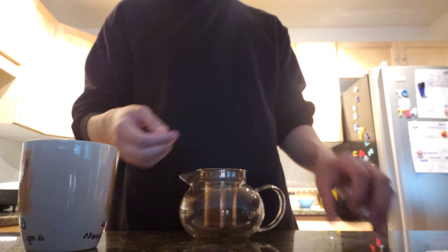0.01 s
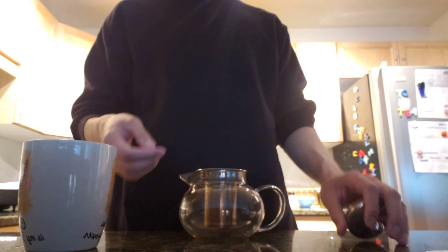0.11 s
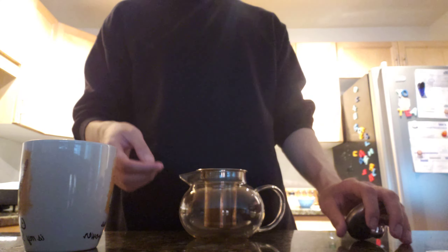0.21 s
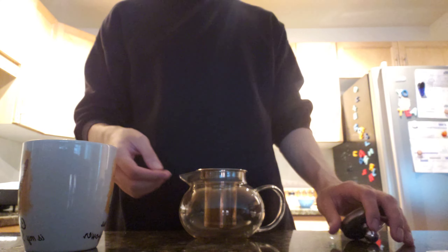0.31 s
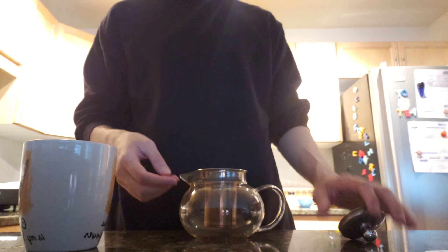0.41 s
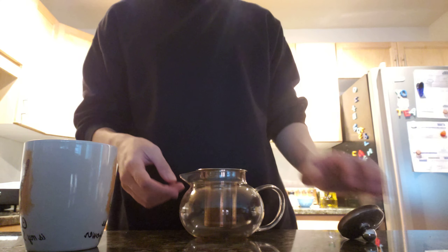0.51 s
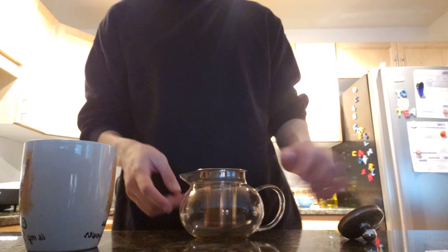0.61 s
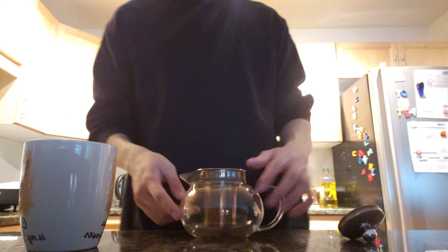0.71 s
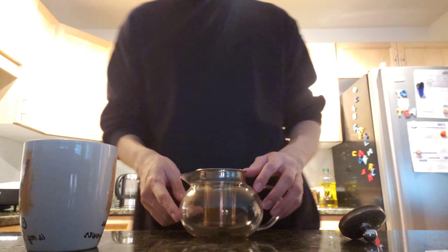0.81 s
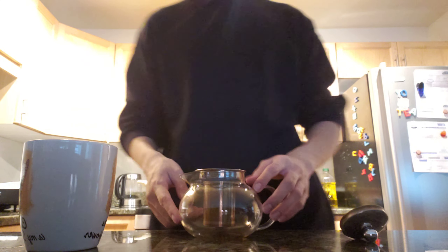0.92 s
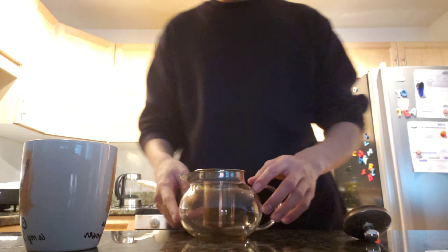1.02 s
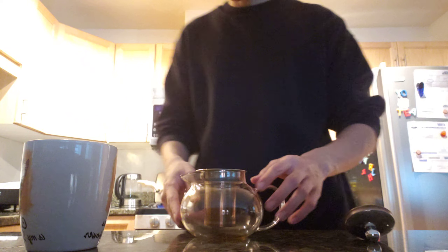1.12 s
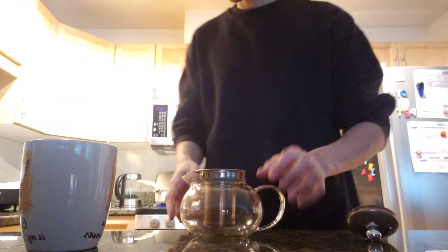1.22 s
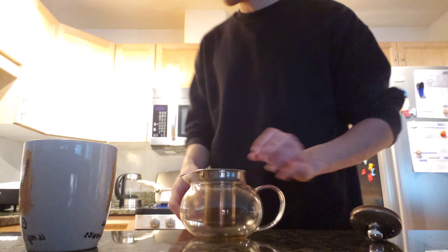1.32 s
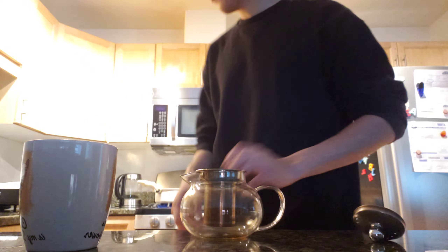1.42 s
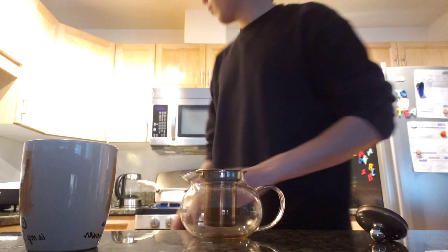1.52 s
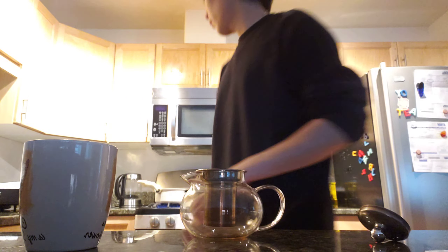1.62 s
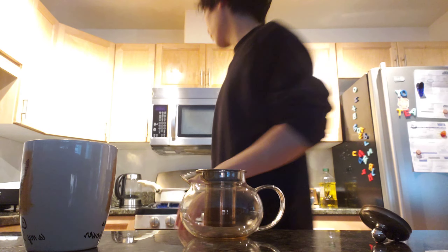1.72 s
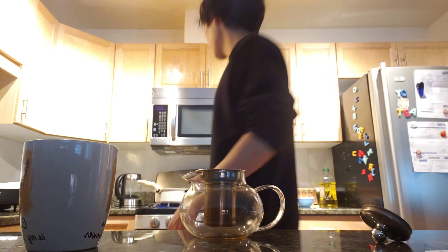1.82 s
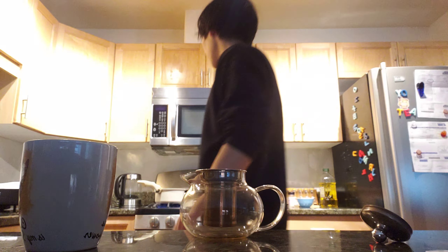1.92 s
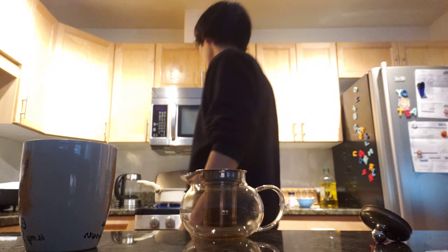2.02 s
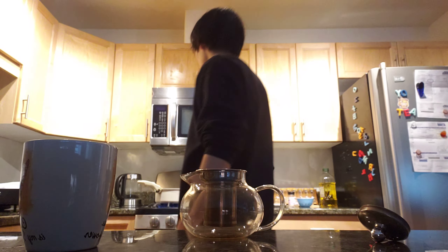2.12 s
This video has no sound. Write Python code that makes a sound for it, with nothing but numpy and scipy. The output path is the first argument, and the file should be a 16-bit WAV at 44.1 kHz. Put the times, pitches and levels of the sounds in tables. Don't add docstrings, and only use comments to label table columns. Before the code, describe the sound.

Close up, a thin metal lid ticks and knocks onto stone, its high ring quickly damped; then soft foot shifts farther off, with short kitchen reflections and quiet air rumble captured by small stereo microphones.

```python
import sys
import numpy as np
from scipy import signal
from scipy.fft import rfft, irfft
from scipy.io import wavfile
from scipy.ndimage import uniform_filter1d

SR = 44100
rng = np.random.default_rng(int(sys.argv[2]) if len(sys.argv) > 2 else 0)


def master(y):
    cut = np.clip(np.atleast_2d(y).T, -1, 1)
    pcm = np.round(cut * 32767)
    wavfile.write(sys.argv[1], SR, pcm.astype(np.int16))


def convert_level_to_amplitude(level_db):
    exponent = np.asarray(level_db, float) / 20
    return 10 ** exponent


N = 97020
T = np.arange(N) / SR
PUSH_S = 0.00062
RIM_TWIST = 1

# (time [s], stone knock [dB], bowl ring [dB], rim ring [dB])
CONTACTS = [(0.3607, -12.5, -12.5, -41.5), (0.3685, -12, -27.5, -45.5), (0.3694, -29, -28.5, -24.5),
            (.3715, -27.5, -29.5, -22.5), (.3730, -20, -32.5, -25), (0.3753, -23.5, -33, -24.5),
            (0.3787, -19, -31, -23), (.3815, -22, -24, -27), (.3838, -25.5, -33.5, -29),
            (.3860, -26, -31, -32.5), (.3930, -25.5, -32, -39.5)]
TICK_S = [.2231, .2296, .2432]
# (body [dB], crack [dB], rim [dB])
TICKS = [
    (-22.5, -24, -18.5),
    (-39.5, -33, -36.5),
    (-35.5, -48, -44),
]
RIM_HZ = [9300, 10540, 10695, 10845, 10960, 11170, 11400, 11542, 11600, 12240, 12908, 13300, 13735, 14490]


def read(table, hz, column=1):
    table = np.array(table)
    return np.interp(np.log(hz), np.log(table[:, 0]), table[:, column])


def band(x, hz, width):
    centre = min(hz, .45 * SR)
    sharpness = max(hz / width, .2)
    return signal.lfilter(*signal.iirpeak(centre, sharpness, fs=SR), x)


def unit(x):
    return x / np.sqrt(np.mean(x ** 2))


def ring(contacts, modes, column, push, spread=0):
    left_lag_s = .000148
    out = np.zeros((2, N))
    scatter = 3.1 * rng.standard_normal((len(contacts), len(modes)))
    twist = spread * rng.standard_normal(len(modes))
    for row, chance in zip(contacts, scatter):
        first = int(row[0] * SR) - 8
        last = first + SR // 2
        for side, lag in ((0, left_lag_s), (1, 0)):
            t = np.maximum(T[first:last] - row[0] - lag, 0)
            for (hz, db, t60, pan), c, turn in zip(modes, chance, twist):
                fade = np.exp(-np.log(1000) * t / t60) * (1 - np.exp(-t / push))
                level = convert_level_to_amplitude(row[column] + db + c - pan * side)
                out[side, first:last] += level * fade * np.sin(2 * np.pi * hz * t + turn * (1 - side))
    return out


def muting(start, drop_db):
    return convert_level_to_amplitude(drop_db * np.clip((T - start) / 0.0012, 0, 1))


def stone_knock():
    stone_hz = [382, 540, 660, 872, 995, 1265, 1400, 1690, 1876, 2010, 2275, 2546, 2722, 3240]
    # (level [dB], fade by 60 dB [s], left-right [dB])
    stone = [(-28.5, 0.017, 2.5), (-25.5, 0.024, 1), (-26, 0.028, -0.5), (-19, 0.07, 1), (-16, 0.04, 0.5),
             (-15.5, 0.015, 2), (-14.5, 0.022, 0.5), (-15.5, 0.038, 1), (-15, 0.03, 3.5), (5, 0.0022, 4),
             (-16, 0.035, 4), (-16.5, 0.025, 5.5), (-17.5, 0.014, 6), (-25, 0.025, 3)]
    knock = ring(CONTACTS, np.c_[stone_hz, stone], 1, PUSH_S / 4)
    return signal.sosfilt(signal.butter(N=2, Wn=260, btype="high", fs=SR, output="sos"), knock)


def bowl_ring():
    bowl_hz = [4164, 4287, 4750, 5184, 5600, 6480]
    # (level [dB], fade by 60 dB [s], left-right [dB])
    bowl = [(-10.5, .15, -5.5), (-2.5, 0.27, -4.5), (-8.5, 0.01, 1), (-10.5, 0.0067, -2),
            (-16.5, 0.0025, -5), (-21.5, 0.022, 0)]
    return ring(CONTACTS, np.c_[bowl_hz, bowl], 2, PUSH_S) * muting(.3733, -12.5)


def rim_ring():
    # (level [dB], fade by 60 dB [s], left-right [dB])
    rim = [(-28, 0.033, -6), (-9, .05, 1.5), (6.5, .09, -2.5), (-2, .1, -2), (-9.5, 0.052, -2),
           (-8.5, 0.087, -2.5), (-12, 0.06, 0), (-4.5, 0.08, -0.5), (-10, 0.04, 0.5), (-15.5, 0.048, 6.5),
           (-12.5, 0.034, 6.5), (-17.5, 0.035, 6.5), (-11, .07, 7), (-17, .07, 6.5)]
    return ring(CONTACTS, np.c_[RIM_HZ, rim], 3, PUSH_S / 2, RIM_TWIST)


def lingering_ring():
    linger_hz = [871, 4165, 4289, 4330]
    # (level [dB], fade by 60 dB [s], left-right [dB])
    linger = [(-26, .13, 3), (-31.5, 0.56, -0.5), (-27, .32, -1), (-29, 0.23, -3)]
    rim_linger_hz = [10695, 10848, 11545, 13735, 14490]
    # (level [dB], fade by 60 dB [s], left-right [dB])
    rim_linger = [(-17, .2, -2), (-24, .17, -2), (-12, .22, 2), (-24, .2, 7), (-23, 0.27, 7)]
    bowl = ring(CONTACTS, np.c_[linger_hz, linger], 1, PUSH_S)
    return bowl + ring(CONTACTS, np.c_[rim_linger_hz, rim_linger], 3, PUSH_S, RIM_TWIST)


def first_ticks():
    tick_body_hz = [888, 1335, 1800, 2794, 4204, 4290, 4850, 5179, 5706, 6800]
    # (level [dB], fade by 60 dB [s], left-right [dB])
    tick_body = [(-25, .06, 3), (-20, .012, 2), (-17.5, .01, 2), (-13, .03, 3.5), (-9, 0.041, -4.5),
                 (-24, .1, -4.5), (1, 0.0098, -4), (-1.5, .012, -2.5), (-13.5, 0.0081, -2),
                 (-9, 0.046, 0.5)]
    # (level [dB], fade by 60 dB [s], left-right [dB])
    tick_rim = [(-28, .03, -6), (-4.5, .03, 2), (1.5, .06, -2), (-4, 0.084, -2), (-5.5, 0.04, -2),
                (-9, .05, -1.5), (-8.5, 0.06, 0.5), (-5, 0.12, -1), (-9, .08, 2.5), (-16.5, 0.048, 6),
                (-14, 0.058, 7), (-17, 0.035, 6), (-11.5, .03, 7), (-13, .12, 6)]
    ticks = np.c_[TICK_S, TICKS]
    body = ring(ticks, np.c_[tick_body_hz, tick_body], 1, PUSH_S / 4)
    return body + ring(ticks, np.c_[RIM_HZ, tick_rim], 3, PUSH_S / 4, RIM_TWIST)


def rim_crack():
    crack_db, crack_s = -1.5, 0.0018
    strikes = [(s, row[1]) for s, row in zip(TICK_S, TICKS)]
    strikes += [(row[0], row[3] + crack_db) for row in CONTACTS]
    puff = sum(convert_level_to_amplitude(db) * np.exp(-np.maximum(T - s, 0) / crack_s) * (T > s) for s, db in strikes)
    burst = puff * rng.standard_normal((2, N))
    low = convert_level_to_amplitude(7) * band(band(burst, 5300, 1500), 5300, 2500)
    middle = convert_level_to_amplitude(-4.5) * band(band(burst, 7500, 2300), 7500, 2300)
    high = band(band(burst, 12000, 3800), 12500, 6000)
    return low + middle + high


def lid():
    muted = muting(.387, -15)
    knock, bowl, rim = stone_knock(), bowl_ring(), rim_ring()
    crack, tick = rim_crack(), first_ticks()
    near = muted * (knock + bowl + rim) + crack + lingering_ring() + tick
    into_room = muted * (knock + convert_level_to_amplitude(-5) * bowl + convert_level_to_amplitude(-5) * rim) + crack + convert_level_to_amplitude(-1.5) * tick
    top = signal.ellip(N=6, rp=.2, rs=40, Wn=14700, fs=SR, output="sos")
    return signal.sosfilt(top, near), signal.sosfilt(top, into_room[1])


def bump(start, length):
    t = np.maximum(T - start, 0) / length
    return (1 - np.exp(-t / 0.05371)) * np.exp(-t ** 2.4)


def board_thuds():
    # (time [s], level [dB], pitch [Hz], length [s])
    thuds = [(0.235, -71, 61, 0.048), (0.375, -55, 112, 0.035), (0.895, -63, 61, 0.039),
             (0.514, -55.5, 564, 0.03), (0.521, -63, 1050, 0.025), (0.694, -52.5, 171.4, 0.024),
             (0.872, -50.5, 171.3, 0.025), (0.911, -48, 177.2, 0.053), (0.915, -54, 376, 0.029),
             (0.916, -61.5, 600, 0.029), (0.969, -57.5, 132, 0.043), (1.026, -56, 245, 0.018),
             (1.097, -63.5, 304, 0.03), (1.677, -63, 160, 0.074), (1.765, -54.5, 208.6, 0.04),
             (1.786, -54.5, 330, 0.017), (1.792, -58, 138.3, 0.05), (1.821, -51, 434.6, 0.028),
             (1.835, -54.5, 623, 0.015), (1.91, -55.5, 579.5, 0.029), (1.96, -67, 171, 0.043)]
    sag_per_s, tone_db, noise_db = 3.8, 1, -2
    out = np.zeros(N)
    for s, db, hz, length in thuds:
        t = np.maximum(T - s, 0)
        tone = np.sin(2 * np.pi * hz * t * (1 - sag_per_s * t / 2))
        noise = unit(band(rng.standard_normal(N), hz, 0.97 * hz))
        push = bump(s, length) * (convert_level_to_amplitude(tone_db) * tone + convert_level_to_amplitude(noise_db) * noise)
        out += convert_level_to_amplitude(db) * band(band(push, hz, 2.4 * hz), hz, 2.4 * hz)
    return out


def sole_scuffs():
    # (time [s], length [s], level [dB], centre [Hz], width [Hz])
    scuffs = [(0.684, 0.075, -62, 1715, 2500), (0.692, 0.058, -58.5, 700, 630),
              (0.696, 0.021, -51, 4010, 1610), (0.698, 0.036, -57.5, 6030, 3940),
              (0.7, 0.036, -67.5, 10900, 5000), (0.854, 0.031, -71.5, 3720, 1000),
              (0.908, 0.15, -66, 589.6, 700), (0.921, 0.048, -80, 2190, 1500),
              (1.025, 0.038, -73, 3820, 892), (1.141, 0.065, -70.5, 1110, 1433),
              (1.145, 0.048, -62.5, 3940, 1400), (1.146, 0.045, -72, 6200, 2960),
              (1.149, .05, -73, 9900, 5000), (1.682, 0.058, -61, 4400, 750),
              (1.686, 0.048, -72.5, 3600, 1196), (1.690, 0.035, -73.5, 6540, 3010),
              (1.774, 0.039, -55, 710, 700), (1.776, 0.047, -70, 3700, 900), (1.821, 0.024, -53, 800, 790),
              (1.829, 0.024, -68, 3370, 800), (1.864, 0.02, -64, 850, 600),
              (1.916, 0.04, -58.5, 3800, 1900), (1.916, 0.035, -59.5, 1040, 1400),
              (1.92, 0.046, -72.5, 6740, 3000), (2.031, 0.054, -66.5, 11330, 3080)]
    grit_db = 3.5
    out = np.zeros(N)
    for s, length, db, hz, width in scuffs:
        grit = rng.standard_normal(N) * convert_level_to_amplitude(grit_db * rng.exponential(size=N))
        out += convert_level_to_amplitude(db) * bump(s, length) * unit(band(band(grit, hz, width), hz, 0.71 * width))
    return out


def air(size):
    hz = np.fft.rfftfreq(size, 1 / SR) + 1
    alike = 1.1 * np.exp(-(hz / 700) ** 2 - (65 / hz) ** 2)
    mid, side = rfft(rng.standard_normal((2, size)))
    shared = np.sqrt(1 + alike) * mid
    opposed = np.sqrt(1 - alike) * side * np.array([[1], [-1]])
    return hz, (shared + opposed) / np.sqrt(2)


def kitchen(x):
    # (pitch [Hz], fade by 60 dB [s], level [dB])
    room = [(100, 0.45, -21), (400, 0.96, -8), (1000, 0.31, -8.5), (2500, 0.51, -8.5), (5000, .5, -10.5),
            (10000, 0.33, -5.5), (14910, 0.39, -9)]
    rise_s = 0.0015
    size = SR
    hz, spec = air(size)
    t, tail = T[:size], 0
    for centre in 60 * 2 ** np.arange(0, 8.5, .5):
        share = np.maximum(1 - 2 * abs(np.log2(hz / centre)), 0)
        t60 = read(room, centre)
        fade = np.exp(-np.log(1000) * t / t60)
        level = convert_level_to_amplitude(read(room, centre, 2)) * np.sqrt(2 * np.log(1000) / t60 / SR)
        tail = tail + irfft(spec * share, size) * fade * level
    return signal.fftconvolve(x[None], tail * (1 - np.exp(-t / rise_s)), axes=1)[:, :N]


def walk(rate):
    k = int(SR / rate)
    return unit(uniform_filter1d(uniform_filter1d(rng.standard_normal(N), k), k))


def ventilation():
    # (pitch [Hz], level [dB per Hz])
    rumble_levels = [(15, -50.5), (25, -19.5), (76, -19), (157, -5.5), (237, -10.5), (279, -4), (319, -7),
                     (409, -4.5), (1300, -41), (1690, -74.5), (2860, -120)]
    hiss_db, total_db = -36, -62.5
    hz, spec = air(N)
    rumble = irfft(spec * convert_level_to_amplitude(read(rumble_levels, hz)) / (1 + (hz / 1300) ** 6), N) * convert_level_to_amplitude(.8 * walk(9.7))
    hiss = irfft(spec * convert_level_to_amplitude(hiss_db) / (1 + (600 / hz) ** 4), N) * convert_level_to_amplitude(.5 * walk(4))
    return unit(rumble + hiss) * convert_level_to_amplitude(total_db)


def scene():
    far_wet_db, left_gain_db = 7, 4.5
    near, into_room = lid()
    feet = board_thuds() + sole_scuffs()
    feet_in_ears = np.array([feet, np.roll(feet, 15)])
    diffuse = kitchen(into_room + convert_level_to_amplitude(far_wet_db) * feet) + feet_in_ears + ventilation()
    return near + diffuse * convert_level_to_amplitude(np.array([[left_gain_db], [-left_gain_db]]) / 2)


def top_cut(x):
    return signal.sosfilt(signal.butter(12, 15820, fs=SR, output="sos"), x)


def record(dry):
    # (pitch [Hz], level [dB])
    mic = [(1300, -0.5), (2400, 3.5), (4000, 0), (5200, -5.5), (8200, -9.5), (9500, -8.5), (11000, -2),
           (13500, -4)]
    top_hz = 15600
    cep = irfft(np.log(convert_level_to_amplitude(read(mic, np.linspace(1, SR / 2, 513)))))
    cep[1:512] = 2 * cep[1:512]
    cep[513:] = 0
    taps = irfft(np.exp(rfft(cep)))[:256]
    coloured = signal.lfilter(taps, 1, dry)
    mix = signal.sosfilt(signal.ellip(8, .2, 60, top_hz, fs=SR, output="sos"), coloured)
    return top_cut(mix)


dry = scene()
out = record(dry)
master(out)
```